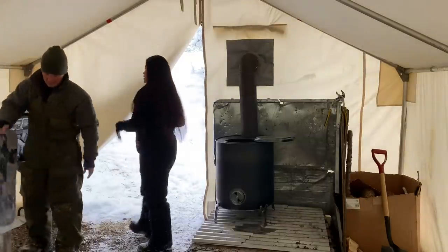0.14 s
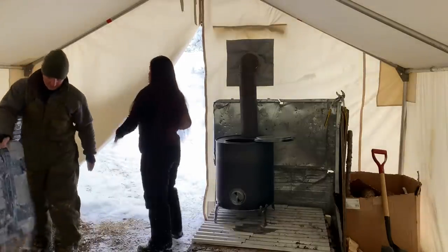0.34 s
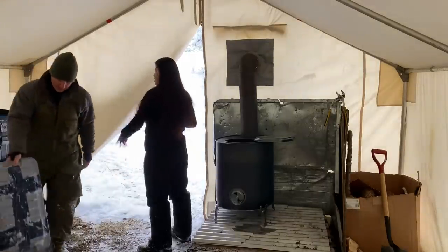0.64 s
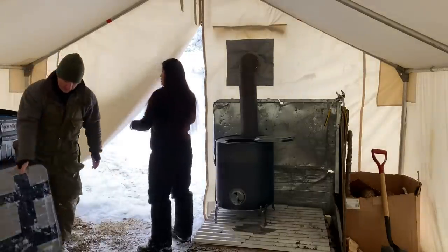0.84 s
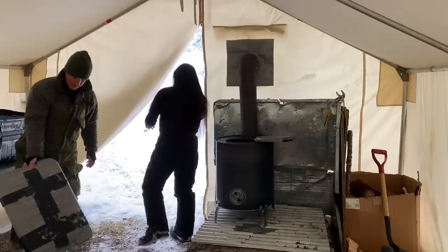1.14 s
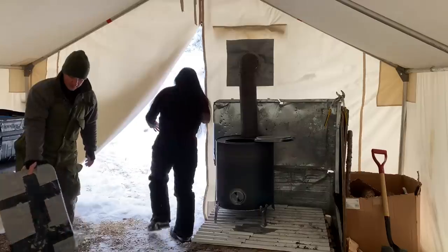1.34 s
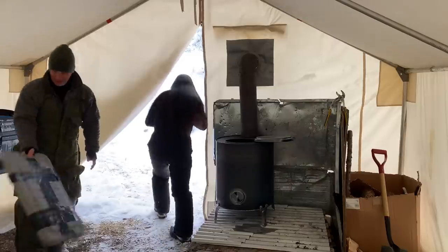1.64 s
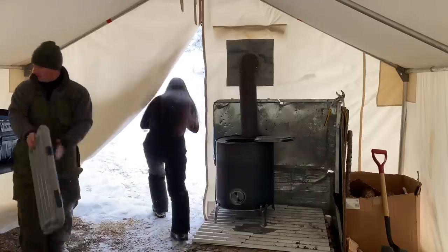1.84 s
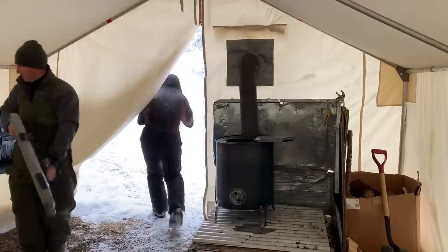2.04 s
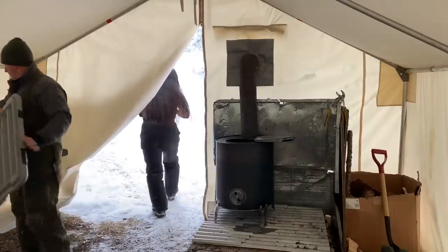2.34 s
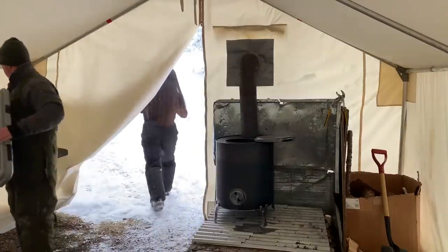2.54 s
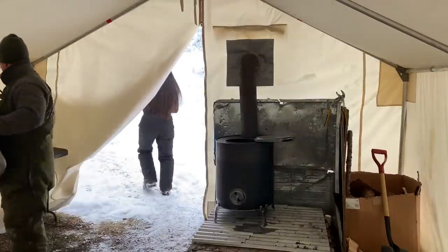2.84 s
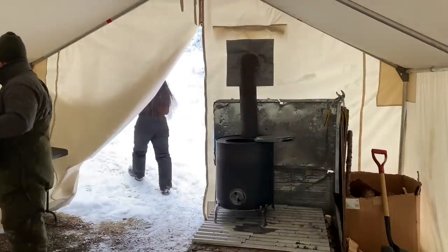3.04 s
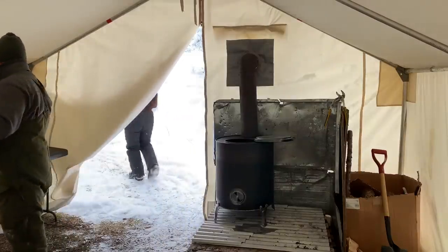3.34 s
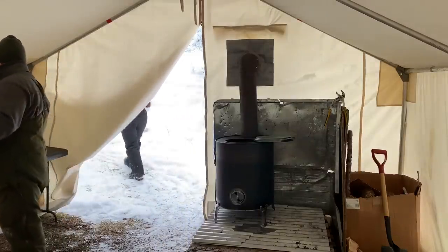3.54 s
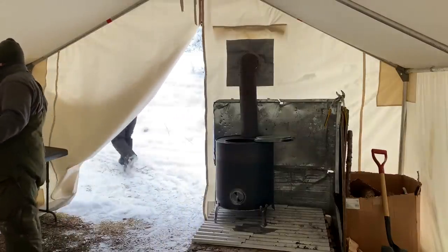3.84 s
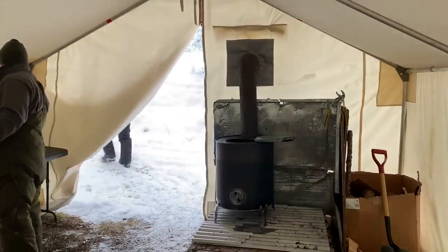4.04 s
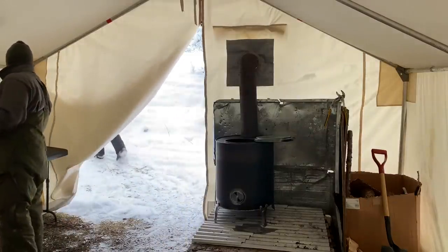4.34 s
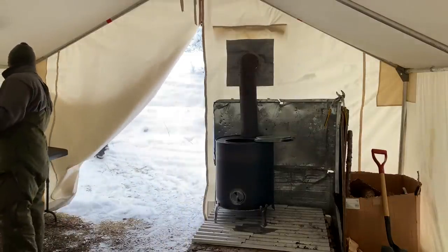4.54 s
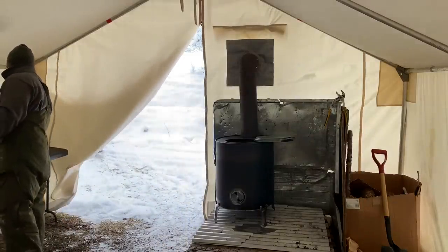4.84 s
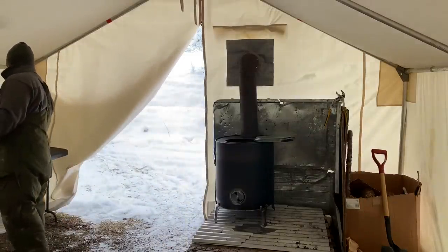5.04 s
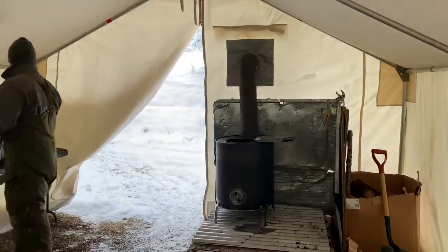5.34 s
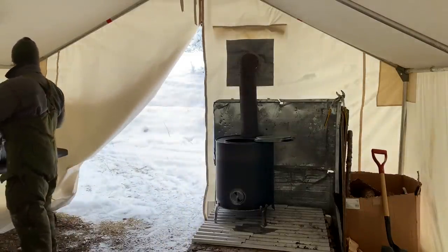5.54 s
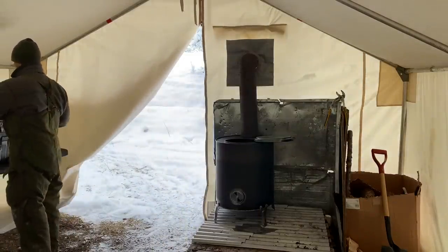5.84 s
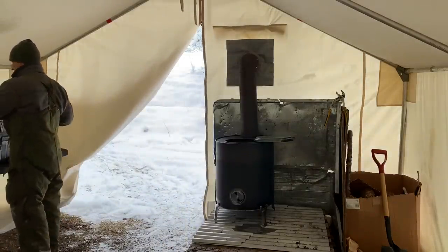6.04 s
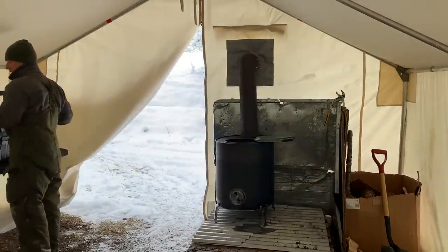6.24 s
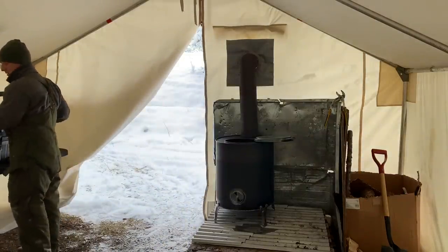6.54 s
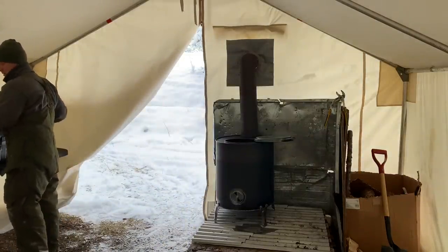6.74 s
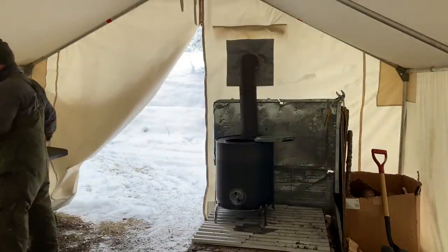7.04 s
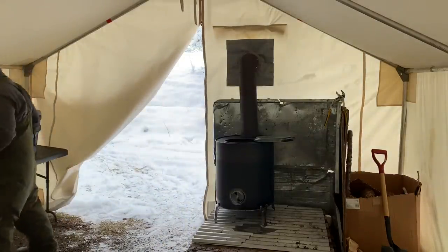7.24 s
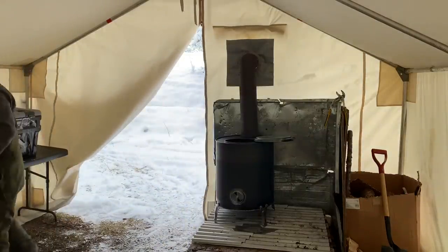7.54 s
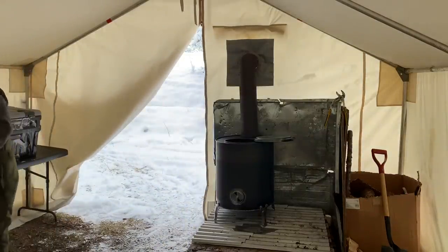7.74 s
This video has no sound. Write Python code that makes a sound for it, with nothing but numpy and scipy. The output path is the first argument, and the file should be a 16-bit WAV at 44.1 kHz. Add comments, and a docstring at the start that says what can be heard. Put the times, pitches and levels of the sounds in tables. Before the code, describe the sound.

Inside a canvas tent, two loud booming case knocks, squeaky snow footsteps and clothing rustle, then sharp clatters of gear on a table.

```python
"""Gear and boots in a winter tent

A hard gear case bumps down twice, with a soft after-knock, and booms (ringing panels); later gear clacks onto a
folding table (noise bursts and ringing). Boots creak, crunch and scuff in packed snow over frozen ground, and
winter clothes rustle (tiny random cracks and noise). Two close microphone ports hear it, with quiet air and the
short answer of the tent."""
import sys
import numpy as np
from scipy import signal
from scipy.fft import rfft, irfft, next_fast_len
from scipy.io import wavfile
from scipy.ndimage import uniform_filter1d, map_coordinates

SR = 44100
rng = np.random.default_rng(int(sys.argv[2]) if len(sys.argv) > 2 else 0)


def persist_wave(psi):
    """Save psi, clipped to +-1, as 16-bit WAV."""
    counts = np.round(np.clip(psi, -1, 1) * 32767).astype(np.int16)
    wavfile.write(sys.argv[1], SR, np.atleast_2d(counts).T)


N = 347508
RING_TIME = np.arange(SR * 3 // 4) / SR  # s, room for the longest ringing

# Levels are relative: the functions below trim each layer. t60/s is the time to fall by 60 dB.
# Still winter air: f/Hz, level/dB
AIR_COLOUR = [(25, -9), (96, -1), (500, -5), (1500, -12), (4500, -28.5), (9000, -30.5), (15800, -27)]
# How long the tent answers: f/Hz, t60/s
TENT_DECAY = [(100, 0.33), (1000, 0.18), (4000, 0.18), (10000, 0.034)]

# Left port ahead of the right: f/Hz, phase/rad
PORT_PHASE = [(90, 0), (250, .3), (500, 1), (750, 1.7), (1700, 3), (3200, 6.1), (5200, 9.4), (6500, 12.5),
              (8000, 9.7), (8900, 9.5), (10000, 11.7), (12000, 11.5), (13000, 9.6), (14000, 9.5),
              (15000, 11.2)]
# Left port louder than the right: f/Hz, level/dB
PORT_BALANCE = [(110, -1), (250, -1), (450, 2), (1000, 2), (2000, 1), (6000, -2), (10000, 0)]
# Share of the sound that is unrelated in the two ports: f/Hz, share/1
PORT_SPREAD = [(100, 0.0055), (400, 0.28), (1500, 0.45), (5000, 0.51), (8000, 0.026), (15000, 0.0099)]
TOP_HZ = 15900  # nothing is kept from here up

# A sole or sleeve slides: middle t/s, length/s, scrape level/dB, hiss level/dB
STROKES = [(0.036, 0.19, -71, -79), (0.368, 0.2, -62, -73), (0.662, 0.67, -61.5, -75),
           (1.026, 0.33, -65.5, -77.5), (1.31, 0.05, -47, -64.5), (1.521, 0.54, -65.5, -76.5),
           (1.651, 0.049, -63.5, -62), (1.787, 0.13, -55, -62.5), (1.903, 0.099, -46.5, -49.5),
           (2.068, 0.164, -54, -57), (2.163, 0.059, -47.5, -43.5), (2.327, 0.38, -57, -85),
           (2.518, 0.3, -58, -66.5), (2.702, 0.14, -51, -60.0), (2.94, 0.113, -62.5, -68),
           (3.08, 0.068, -54.5, -74.5), (3.184, 0.12, -58, -70.5), (3.301, 0.07, -58, -58.5),
           (3.361, 0.05, -53, -48.5), (3.51, 0.12, -64, -70.5), (3.66, 0.18, -66.5, -104),
           (3.903, 0.13, -70, -75), (3.963, 0.042, -54, -46.5), (4.096, 0.078, -67.5, -72),
           (4.259, 0.068, -55.5, -62.5), (4.377, 0.084, -47, -52.5), (4.491, 0.12, -59.5, -55.5),
           (4.63, 0.118, -58.5, -64), (4.68, 0.49, -63.5, -97), (5.014, 0.111, -62.5, -55.5),
           (5.129, 0.091, -55, -57.5), (5.21, 0.081, -58.0, -59.5), (5.628, 0.37, -69.5, -74.5),
           (6.107, 0.094, -59, -67.5), (6.296, 0.143, -48.5, -63.5), (6.492, 0.039, -46.5, -69),
           (6.627, 0.028, -60, -94), (6.821, 0.043, -64, -74), (7.222, 0.12, -62, -68),
           (7.235, 0.33, -62, -77), (7.31, 0.045, -76, -62), (7.58, 0.32, -69.5, -84),
           (7.703, 0.062, -61, -72.5), (7.782, 0.067, -52, -59), (7.865, 0.068, -55.5, -64.5)]
STROKE_STEEPNESS = 3.04  # a stroke speeds up and slows down gently
# Scraped crust, rubbed cloth and loose powder, each: f/Hz, level/dB
SCRAPE_COLOUR = [(88, -37.5), (150, -13), (335, -4), (443, -1), (655, -5), (722, 1), (1180, -6), (1400, -7),
                 (2000, -23), (2600, -36), (4400, -120)]
RUSTLE_COLOUR = [(900, -18.5), (1700, 1), (3000, -2.5), (5000, -4), (7000, -19), (12000, -46)]
POWDER_COLOUR = [(3500, -23.5), (5500, -5), (6800, -1), (8500, -1.5), (11000, -4), (15500, -4.5)]
RUSTLE_HISS_SHARE = 0.27  # the rustle level lies between scrape (0) and hiss (1)
# Clothes never keep quite still; the rate is in random points a second
FIDGET_SCRAPE_DB, FIDGET_HISS_DB, FIDGET_SWING_DB, FIDGET_RATE = -77.5, -88, 1.5, 9
# Trouser legs brush past each other with a thin zip: t/s, level/dB
SWISHES = [(2.132, -28), (3.338, -44.5), (3.945, -41), (4.461, -35.5), (5.113, -37), (5.649, -50.5),
           (6.735, -53.5)]
# Sound of the woven cloth: f/Hz, level/dB
WEAVE_COLOUR = [(1500, -24), (3500, -9), (5400, 0), (6600, 5.5), (7600, 3), (11000, -13), (15500, -21)]
# Its dying away: f/Hz, t60/s
WEAVE_DECAY = [(4000, 0.13), (12000, 0.1)]

# A boot comes down (the row at 0.941 s is a soft after-knock of the case, made the same way): t/s, heel crunch
# level/dB, creak level/dB, ground thump level/dB
FOOTFALLS_AND_KNOCK = [(0.941, -60, -40, -64), (1.661, -46, -34, -39), (1.836, -31, -31, -65),
                       (2.133, -68, -59, -34.5), (2.296, -43, -59, -48), (2.371, -61, -35.5, -49),
                       (2.518, -61, -37, -54), (2.812, -64, -43.5, -48), (3.055, -44.5, -55, -65),
                       (3.346, -55, -50, -37), (3.470, -67, -48, -52), (3.535, -68, -49, -61),
                       (3.945, -58, -71, -56.5), (3.985, -57.5, -55, -37), (5.114, -54, -68, -40.5),
                       (5.489, -67.5, -53, -44.5), (6.064, -65, -63.5, -34.5), (7.202, -68, -56, -43.5)]
# Snow gives way in evenly spaced slips: first t/s, count/1, gap/s, creak level/dB, ground thump level/dB
SLIP_RUNS = [(.676, 2, 0.071, -48, -54), (1.607, 2, 0.091, -42.5, -41), (2.148, 2, 0.027, -36, -50),
             (2.211, 3, 0.053, -44, -42.5), (2.436, 2, .057, -39.5, -39), (2.881, 4, .053, -35, -38),
             (3.427, 2, .066, -41.5, -39.5), (3.571, 2, 0.038, -40.5, -38.5), (3.634, 2, 0.03, -44, -46),
             (4.064, 3, 0.059, -49, -33.5), (4.468, 3, 0.067, -54, -39), (4.678, 2, 0.094, -53, -37),
             (5.241, 2, 0.11, -61.5, -37), (7.395, 2, 0.088, -57.5, -43), (7.572, 2, 0.078, -58, -31)]
SLIP_SCATTER_DB, THUMP_LAG_S = 1.9, .006  # slips differ in strength; the ground follows just after each
# A boot bears weight and keeps crushing the packed layer: middle t/s, length/s, low crunch level/dB
LOADS = [(.4, 0.14, -54.5), (1.94, .18, -53.5), (2.39, .29, -50), (2.72, 0.15, -64), (2.99, 0.11, -50),
         (3.57, 0.27, -43.5), (4.095, 0.323, -45), (4.365, 0.071, -49.5), (4.645, 0.33, -44),
         (5.125, 0.1, -49.5), (5.34, 0.18, -47), (6.495, 0.054, -40), (6.655, 0.076, -48.5),
         (6.85, 0.28, -54.5), (7.04, 0.13, -46.5), (7.72, .23, -52.5)]
LOAD_STEEPNESS = 8  # weight comes on and goes off quickly
# Low crunch of the crushed layer: f/Hz, level/dB
WEIGHT_COLOUR = [(20, -47), (45, -15), (65, 1), (100, 1.5), (130, -4), (200, -21), (330, -17), (600, -67)]
# Heel crunch: f/Hz, level/dB
HEEL_COLOUR = [(35, -37), (90, 3), (220, -0.5), (500, 2.5), (750, -37), (1500, -9.5), (5000, -33.5)]
# Its dying away: f/Hz, t60/s
HEEL_DECAY = [(250, 0.32), (1500, 0.14)]
# Creaking snow: f/Hz, level/dB
CREAK_COLOUR = [(35, -35), (120, -15), (300, -8), (480, -2), (800, -3.5), (1100, -21), (1550, -10),
                (2200, -49), (6000, -42)]
# Its dying away: f/Hz, t60/s
CREAK_DECAY = [(300, 0.022), (800, 0.15), (2000, 0.021)]
# Ringing of boot on snow, then of the ground, each: f/Hz, level/dB, t60/s
SOLE_MODES = [(447, -2.5, 0.085), (640, -21, 0.0057), (677, -6.5, 0.078), (807, -2.5, 0.018),
              (980, -5, 0.075), (1320, -48, 0.02)]
GROUND_MODES = [(63, -8, 0.29), (95.7, 0.5, 0.099), (111.6, -3.5, 0.1), (145.5, 6.5, 0.023)]

# Gear meets the table: t/s, crack level/dB, knock level/dB, thud level/dB, rise time of the crack/s
CLACKS = [(5.779, -31.5, -40, -34, .008), (5.820, -22.5, -24, -30, 0.00116),
          (5.825, -25.5, -24, -17.5, .003), (5.866, -39.5, -43.5, -32, .005),
          (6.272, -37, -33.5, -29.5, .01), (6.303, -30, -30.5, -27, 0.0049),
          (6.312, -19.5, -51, -44, 0.0016), (6.321, -40, -35.5, -20, .004), (6.347, -28, -33, -25.5, .005),
          (6.372, -29, -38, -28.5, 0.0029), (6.476, -45, -55.5, -47.5, 0.0027),
          (6.61, -49.5, -57.5, -51.5, 0.0026), (6.834, -46, -56, -55, 0.0025),
          (7.764, -38.5, -44, -41, 0.0069)]
# The crack: f/Hz, level/dB
CLACK_COLOUR = [(90, 4), (220, -3), (450, -7), (700, -7.5), (1000, -11.5), (1700, -9), (3500, -10.5),
                (6500, -16.5), (11000, -26.5), (15800, -30)]
# Its dying away: f/Hz, t60/s
CLACK_DECAY = [(300, 0.34), (900, 0.32), (2000, 0.18), (6000, 0.11), (14000, 0.168)]
# Ringing of the knocked edges, then of the table top, each: f/Hz, level/dB, t60/s
EDGE_MODES = [(313, -11, 0.28), (473, 6, 0.084), (617, 4, 0.034), (866, -1.5, 0.095), (939, 5.5, 0.1),
              (1058, -7, 0.24), (1404, -2.5, 0.059), (1724, -6.5, 0.064)]
TABLE_MODES = [(62.6, -8, 0.35), (88.8, -3.5, 0.12), (120.4, -1, 0.16), (136.4, -3.5, 0.14),
               (227, -17.5, 0.48), (299, -8, .14)]
# A latch snaps shut with a bright tick: t/s, level/dB
SNAPS = [(5.821, -28.5), (6.314, -22)]
# The snap: f/Hz, level/dB
SNAP_COLOUR = [(2000, -16), (4000, -4), (7000, -1), (10500, -2), (15500, -1)]
# Its dying away: f/Hz, t60/s
SNAP_DECAY = [(3000, 0.037), (14000, 0.061)]

# The case bumps down: t/s, level/dB, change of boom/dB, change of upper ringing/dB, factor on t60/1
BUMPS = [(.801, 1, 1, -2, 0.75), (1.303, 3.5, -2, -7, 0.92)]
# Ringing of the case shell, before each bump's changes: f/Hz, level/dB, t60/s
SHELL_MODES = [(69.3, -2.5, 0.08), (91.2, -8, 0.28), (120.5, -14, 0.62), (182.5, -11.5, 0.07),
               (242.6, -11.5, 0.18), (302.4, -23.5, 0.11), (344, -18.5, 0.32), (402.4, -15.5, 0.065),
               (436.4, -9, 0.15), (500, -15, 0.28), (674, -14, 0.061), (725.6, -21.5, 0.14),
               (786.5, -11.5, 0.14), (989.6, -10.5, 0.16), (1305, -28.5, 0.27), (1502, -33, 0.26),
               (1667, -37.5, 0.24), (1790, -30, 0.078), (2388, -29, 0.2), (2830, -26.5, 0.025)]
# Noise of the contact: f/Hz, level/dB
BUMP_COLOUR = [(40, -31.5), (170, -19.5), (400, -12.5), (650, -18), (1000, -18.5), (1350, -27.5),
               (1900, -31.5), (2700, -35), (4000, -41), (7000, -47), (11000, -45.5), (15800, -45)]
# Its dying away: f/Hz, t60/s
BUMP_DECAY = [(150, 0.19), (1000, 0.11), (4000, 0.16), (14000, 0.12)]
# The case is tipped in stereo, left minus right: f/Hz, level/dB
CASE_BALANCE = [(120, -1), (250, 3), (500, 2.5), (1000, 1), (2500, 0)]


def amp(db):
    """Turn decibels into gain."""
    return 10 ** (np.asarray(db) / 20)


def unit(x):
    """Scale to an average strength (rms) of 1."""
    return x / np.sqrt(np.mean(x ** 2) + 1e-20)


def along(points, hz):
    """Read between (f/Hz, value) points, with frequency on a log axis."""
    f, values = np.transpose(points)
    return np.interp(np.log(hz + 1), np.log(f + 1), values)


def filtered(x, response):
    """Shape x by a response of frequency, which may also shift phase."""
    n = x.shape[-1]
    padded = next_fast_len(n + SR // 5)
    spectrum = rfft(x, padded) * response(np.fft.rfftfreq(padded, 1 / SR))
    return irfft(spectrum, padded)[..., :n]


def lean(x, balance):
    """Tip a stereo sound to one side by (f/Hz, left minus right level/dB) points."""
    sides = np.array([[.5], [-.5]])
    return filtered(x, lambda hz: amp(sides * along(balance, hz)))


def spread(pair, colour):
    """Colour two unrelated signals and blend them into a partly alike left and right."""
    def response(hz):
        share = np.clip(along(PORT_SPREAD, hz), 0, 1)
        return amp(along(colour, hz)) * np.sqrt([1 - share, share])
    mid, side = filtered(pair, response)
    return unit(np.array([mid + side, mid - side]))


def dying(x, decay):
    """Let each frequency of x die at its own speed."""
    hz, t, z = signal.stft(x, SR, nperseg=128)
    fade = amp(-60 * t / along(decay, hz)[:, None])
    return signal.istft(z * fade, SR, nperseg=128)[1][:, :x.shape[1]]


def burst(colour, decay, attack):
    """One contact: coloured noise that rises over about attack seconds and dies quickly."""
    t = RING_TIME[:SR // 3]
    noise = spread(rng.standard_normal((2, len(t))), colour)
    return dying(noise, decay) * (1 - np.exp(-t / attack))


def ring(modes, attack_cycles, scatter_db, detune):
    """Fading tones, varied at each blow; low ones swell slowly, and left and right are out of step."""
    hz, db, t60 = np.transpose(modes)[:, :, None]
    size, pitch, lag = rng.standard_normal((3, len(modes), 1))
    sign = (-1) ** np.arange(len(modes))[:, None]
    t = RING_TIME[RING_TIME < t60.max() * 3 / 2]
    swell = 1 - np.exp(-t * hz / attack_cycles)
    envelope = sign * amp(db + scatter_db * size - 60 * t / t60) * swell
    phase = 2 * np.pi * hz * (1 + detune * pitch) * t
    skew = lag * np.sqrt(np.abs(along(PORT_SPREAD, hz)))
    return np.array([np.sum(envelope * np.sin(phase + side * skew), 0) for side in (1, -1)])


def grains(colour, rate, size_db, smooth):
    """Tiny random cracks of uneven size, rate per second, on a bed of smooth friction noise."""
    present = rng.random((2, N)) < rate / SR
    sizes = amp(size_db * np.minimum(rng.exponential(size=(2, N)), 4))
    cracks = present * rng.choice([-1, 1], (2, N)) * sizes
    return spread(unit(cracks) + smooth * rng.standard_normal((2, N)), colour)


def patchy(x, patchy_db):
    """Different folds and crystals sound from moment to moment, so the colour keeps shifting."""
    z = signal.stft(x, nperseg=256)[2]
    field = rng.standard_normal(z.shape[1:])
    field = uniform_filter1d(field, size=5, axis=0)  # smooth over frequency
    field = uniform_filter1d(field, size=8, axis=1)  # smooth over time
    return unit(signal.istft(z * amp(patchy_db * unit(field)), nperseg=256)[1][:, :N])


def wobble(rate):
    """A smooth curve through rate random points a second."""
    points = rng.standard_normal(int(N * rate / SR) + 4)
    return map_coordinates(points, [np.arange(N) * rate / SR])


def swells(rows, steepness):
    """Gain of lasting contacts (middle t/s, length/s, level/dB): bells, half as strong at their two ends."""
    t = np.arange(N) / SR
    coarse = t[::SR // 1000]  # about 1000 steps a second are enough
    power = 0
    for middle, length, db in rows:
        bell = amp(db) / (1 + np.abs(2 * (coarse - middle) / length) ** steepness)
        power = power + bell ** 2
    return np.interp(t, coarse, np.sqrt(power))


def add(track, s, sound):
    """Mix a sound into the track at time s."""
    part = track[:, max(round(s * SR), 0):][:, :sound.shape[-1]]
    part += sound[..., :part.shape[1]]


def air():
    """Still winter air is a steady, faint noise."""
    return amp(-68.5) * spread(rng.standard_normal((2, N)), AIR_COLOUR)


def tent(x):
    """Canvas walls give a short, dull answer: a fading noise tail after a small delay."""
    noise = spread(rng.standard_normal((2, SR // 4)), [(100, 3), (3000, 0.5), (15000, -7)])
    tail = dying(noise, TENT_DECAY)
    delayed = np.pad(x, ((0, 0), (round(0.0073 * SR), 0)))
    return signal.fftconvolve(delayed, tail / np.linalg.norm(tail[0]), axes=1)[:, :N]


def glances(x, count=5):
    """Stove, shield and table throw back the upper range within a few milliseconds."""
    delays = rng.uniform(0.00195, .014, count)  # s

    def response(hz):
        upper = hz ** 2 / (hz ** 2 + 800 ** 2)
        echoes = sum(np.exp(-2j * np.pi * hz * d) for d in delays)
        return upper * echoes / np.sqrt(count)
    return filtered(x, response)


def swishes():
    """Trouser legs brush past each other: the weave gives short bursts of high noise."""
    out = np.zeros((2, N))
    for s, db in SWISHES:
        add(out, s, amp(db) * burst(WEAVE_COLOUR, WEAVE_DECAY, attack=0.016))
    return out


def scuffs():
    """Sliding soles scrape the crust, cloth rubs, and loose powder hisses, all led by the same strokes."""
    middle, length, scrape_db, hiss_db = np.transpose(STROKES)
    fidget = amp(FIDGET_SWING_DB * wobble(FIDGET_RATE))

    def motion(db, rest_db):
        return np.hypot(swells(zip(middle, length, db), STROKE_STEEPNESS), amp(rest_db) * fidget)
    scraping = motion(scrape_db, FIDGET_SCRAPE_DB)
    hissing = motion(hiss_db, FIDGET_HISS_DB)
    rubbing = scraping ** (1 - RUSTLE_HISS_SHARE) * hissing ** RUSTLE_HISS_SHARE
    catch_db = 1.4 * wobble(60)  # rubbing surfaces catch and slip
    crust = grains(SCRAPE_COLOUR, rate=190, size_db=3.0, smooth=0.97)
    cloth = patchy(grains(RUSTLE_COLOUR, rate=1600, size_db=-0.1, smooth=.9), patchy_db=1.5)
    powder = patchy(grains(POWDER_COLOUR, rate=1800, size_db=3.0, smooth=1.5), patchy_db=3.0)
    scrape = scraping * amp(catch_db + 0.5) * crust
    rustle = rubbing * amp(catch_db) * cloth
    hiss = hissing * amp(4.0) * powder
    return scrape + rustle + hiss


def slip(creak_db, thump_db):
    """Snow gives way once: the sole creaks and the ground thumps as it settles."""
    out = np.zeros((2, len(RING_TIME)))
    creak = burst(CREAK_COLOUR, CREAK_DECAY, attack=0.00084)
    sole = ring(SOLE_MODES, attack_cycles=0.18, scatter_db=.5, detune=0.028)
    thump = ring(GROUND_MODES, attack_cycles=0.7, scatter_db=1.3, detune=0.057)
    add(out, 0, amp(creak_db - 2.0) * creak)
    add(out, 0, amp(creak_db - 3) * sole)
    add(out, THUMP_LAG_S, amp(thump_db) * thump)
    return out


def boots():
    """Heels crunch in, snow slips in runs under the sole, and the packed layer crushes under weight. One row
    made like a footfall is the case's soft after-knock."""
    out = np.zeros((2, N))
    for s, heel_db, creak_db, thump_db in FOOTFALLS_AND_KNOCK:
        add(out, s, amp(heel_db - 0.5) * burst(HEEL_COLOUR, HEEL_DECAY, attack=0.0045))
        add(out, s, slip(creak_db, thump_db))
    for first, count, gap, creak_db, thump_db in SLIP_RUNS:
        for k in range(round(count)):
            strength = amp(SLIP_SCATTER_DB * rng.standard_normal())
            add(out, first + k * gap, strength * slip(creak_db, thump_db))
    weight = swells(LOADS, LOAD_STEEPNESS)
    crushing = grains(WEIGHT_COLOUR, rate=140, size_db=3, smooth=0.61)
    return out + amp(-3.5) * weight * crushing


def table():
    """Latches snap, and edges crack and knock on the table top, which thuds when it takes the weight."""
    out = np.zeros((2, N))
    for s, db in SNAPS:
        add(out, s, amp(db - 1) * burst(SNAP_COLOUR, SNAP_DECAY, attack=.003))
    for s, crack_db, knock_db, thud_db, rise in CLACKS:
        crack = burst(CLACK_COLOUR, CLACK_DECAY, attack=rise)
        knock = ring(EDGE_MODES, attack_cycles=0.81, scatter_db=2, detune=0.0436)
        thud = ring(TABLE_MODES, attack_cycles=0.41, scatter_db=1.85, detune=0.023)
        add(out, s, amp(crack_db - 4) * crack)
        add(out, s, amp(knock_db - 4.5) * knock)
        add(out, s, amp(thud_db) * thud)
    return out


def case():
    """The case brushes the ground, then cracks down on its shell, whose big panels boom on."""
    out = np.zeros((2, N))
    for s, db, boom_db, upper_db, hold in BUMPS:
        modes = []
        for hz, level, t60 in SHELL_MODES:
            change_db = boom_db if hz < 200 else upper_db
            modes.append((hz, level + change_db, t60 * hold))
        brush = burst(BUMP_COLOUR, BUMP_DECAY, attack=.012)
        boom = ring(modes, attack_cycles=0.98, scatter_db=2.54, detune=0.00087)
        crack = burst(BUMP_COLOUR, BUMP_DECAY, attack=0.0016)
        add(out, s - .012, amp(db - 32) * brush)  # just ahead of the blow
        add(out, s, amp(db) * boom)
        add(out, s, amp(db - 11) * crack)
    return out


def scene():
    """Gear, clothes and steps in the tent, with their echoes, over still winter air."""
    near = scuffs() + swishes() + boots() + table() + lean(case(), CASE_BALANCE)
    return air() + amp(-19) * tent(near) + amp(-10) * glances(near) + near


def record(dry):
    """The two ports differ in phase and level; loud peaks are rounded and the top of the band is cut."""
    sides = np.array([[.5], [-.5]])

    def port_response(hz):
        return amp(sides * along(PORT_BALANCE, hz)) * np.exp(1j * sides * along(PORT_PHASE, hz))
    ports = filtered(dry, port_response)
    rounded = ports / (1 + np.abs(ports) ** 6) ** (1 / 6)
    return filtered(rounded, lambda hz: hz < TOP_HZ)


dry = scene()
out = record(dry)
persist_wave(out)
```